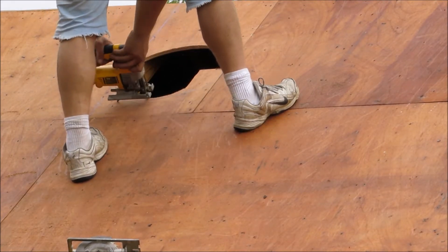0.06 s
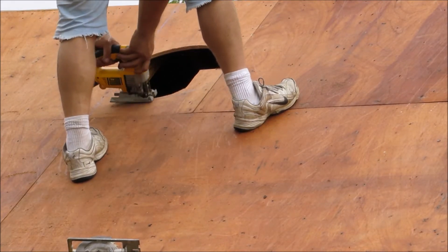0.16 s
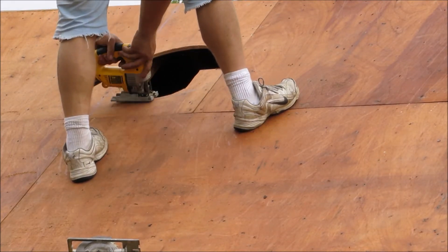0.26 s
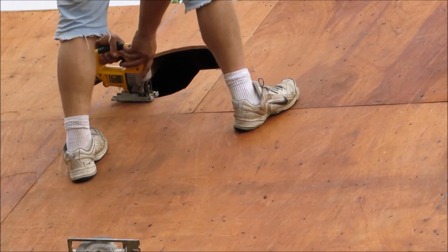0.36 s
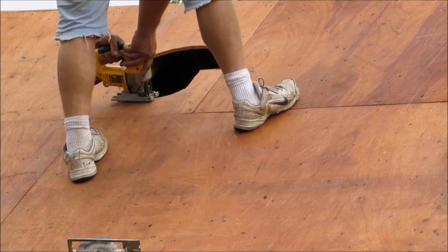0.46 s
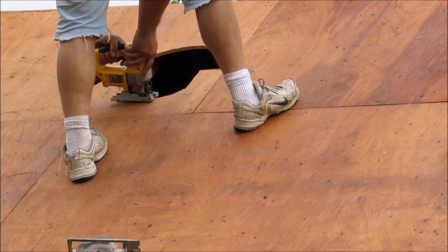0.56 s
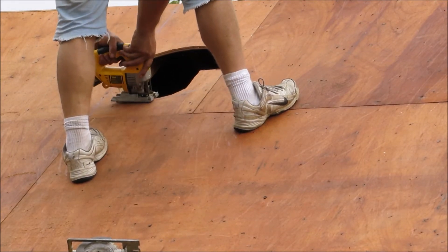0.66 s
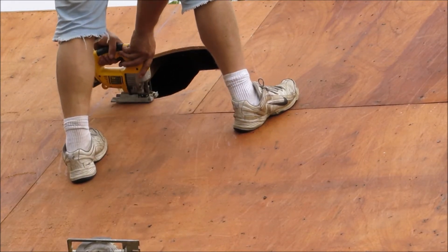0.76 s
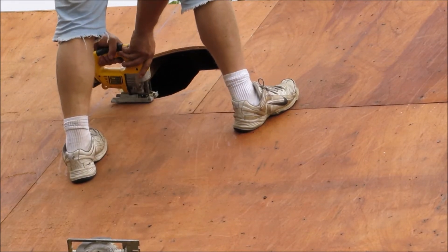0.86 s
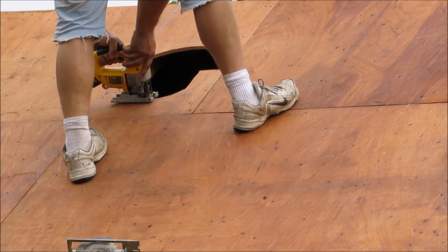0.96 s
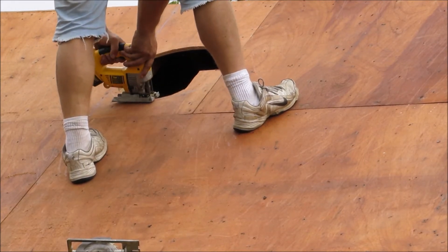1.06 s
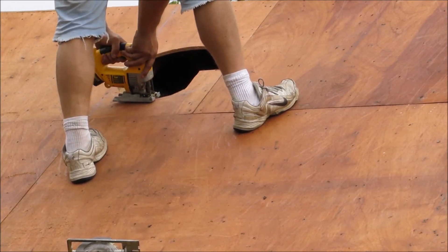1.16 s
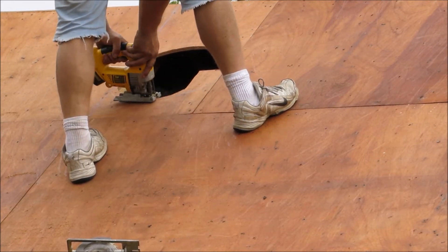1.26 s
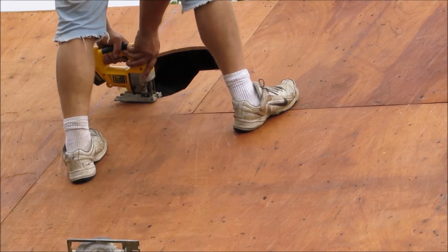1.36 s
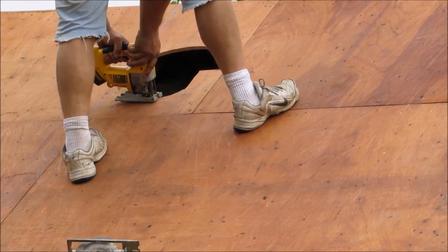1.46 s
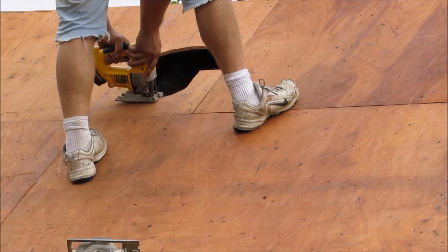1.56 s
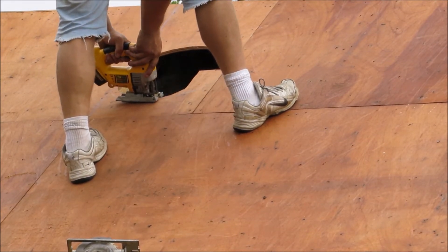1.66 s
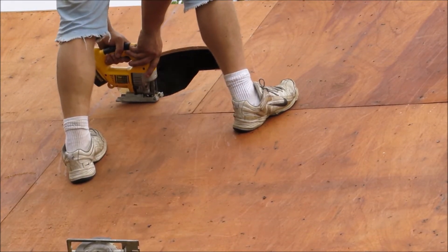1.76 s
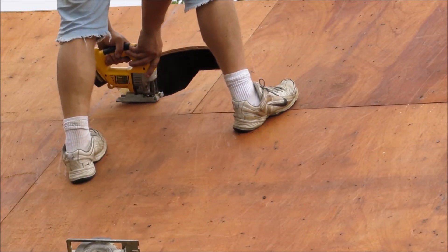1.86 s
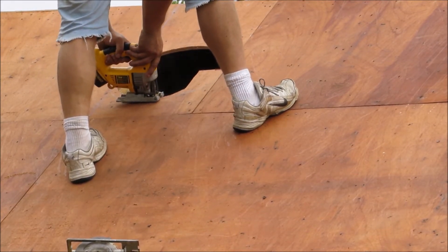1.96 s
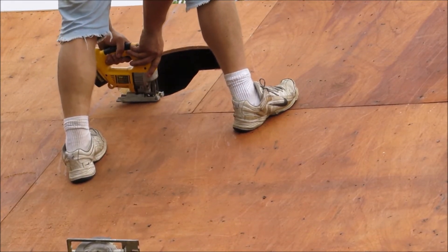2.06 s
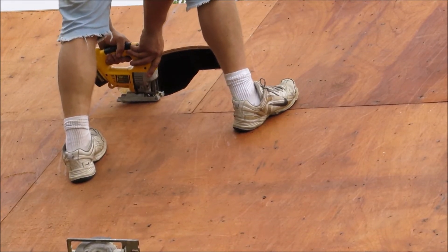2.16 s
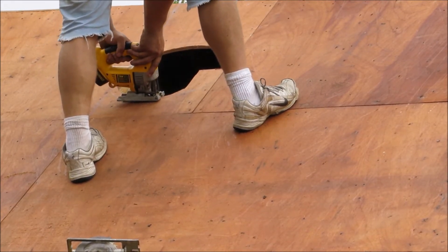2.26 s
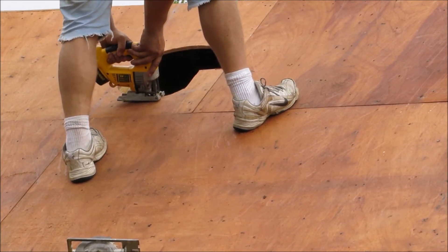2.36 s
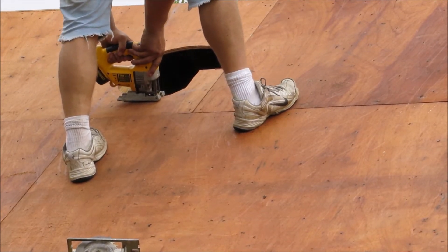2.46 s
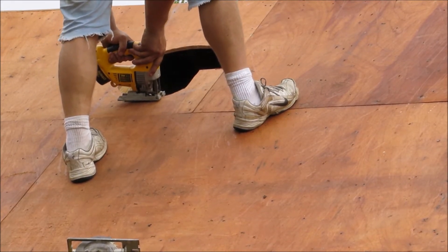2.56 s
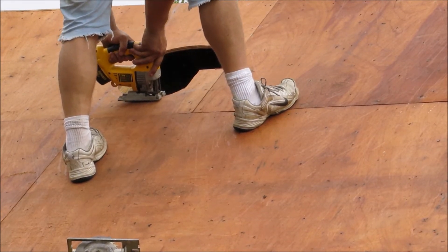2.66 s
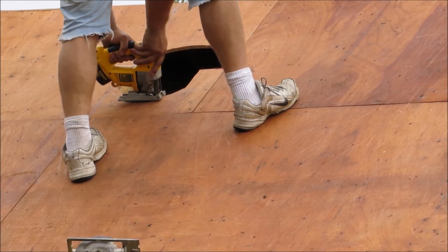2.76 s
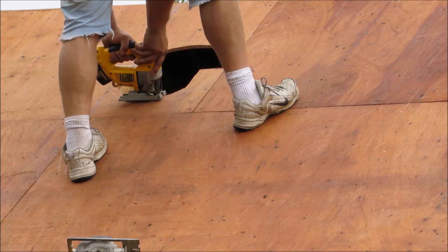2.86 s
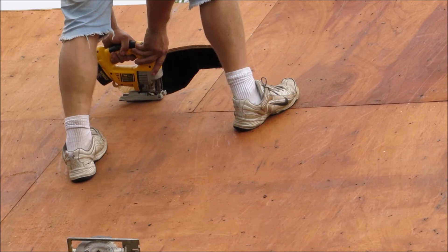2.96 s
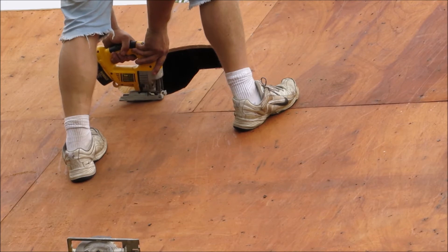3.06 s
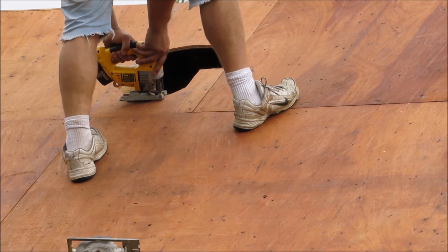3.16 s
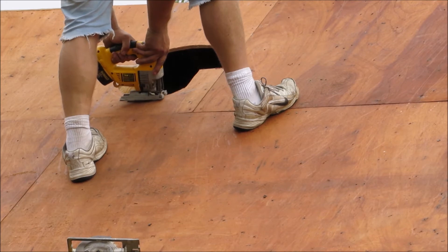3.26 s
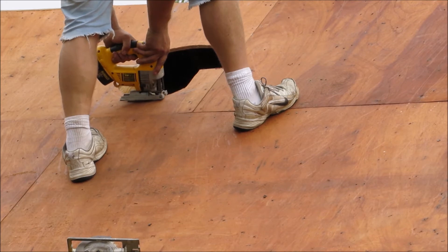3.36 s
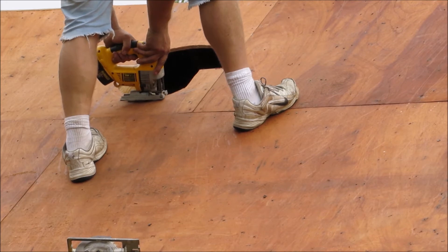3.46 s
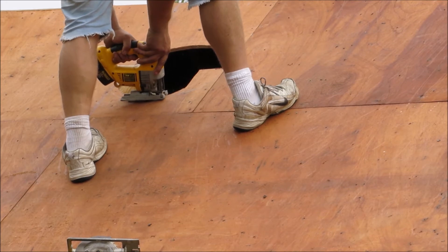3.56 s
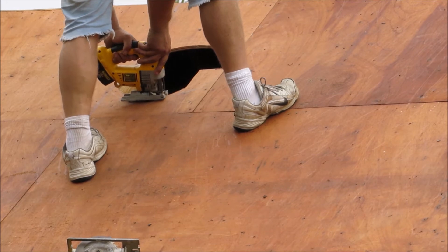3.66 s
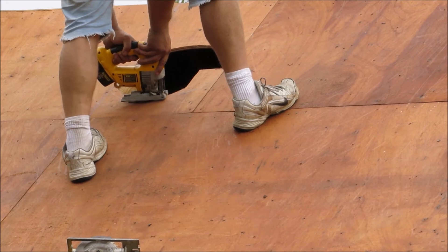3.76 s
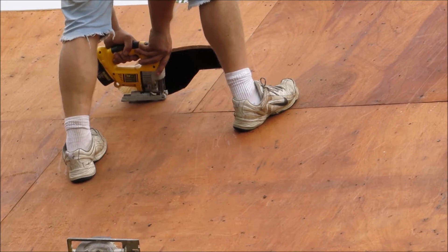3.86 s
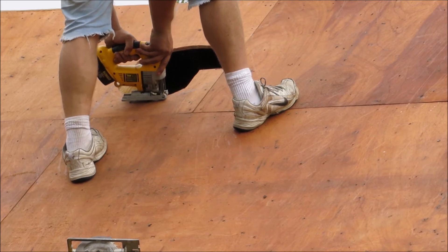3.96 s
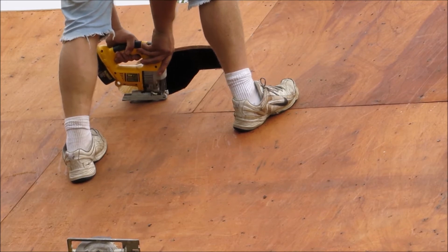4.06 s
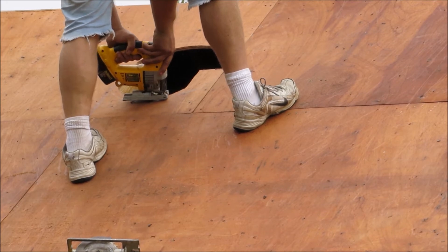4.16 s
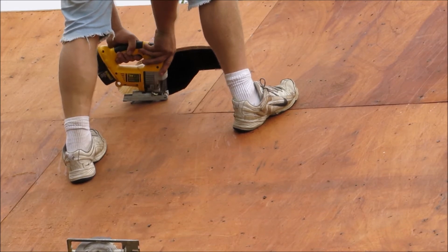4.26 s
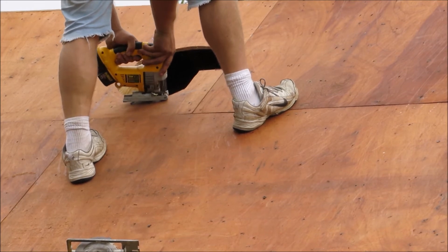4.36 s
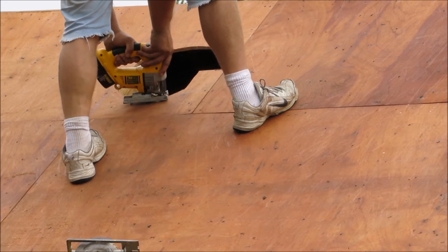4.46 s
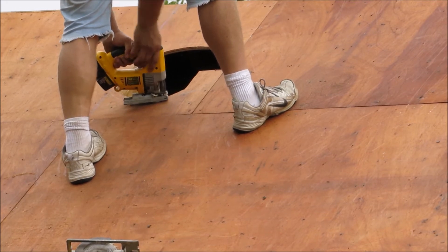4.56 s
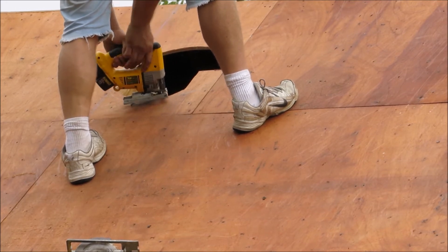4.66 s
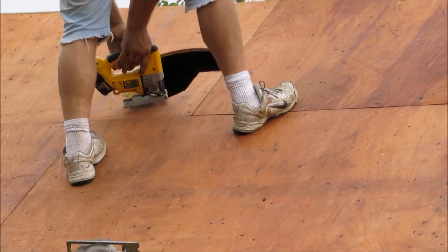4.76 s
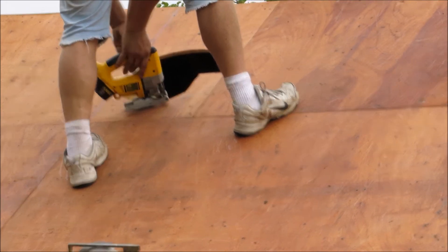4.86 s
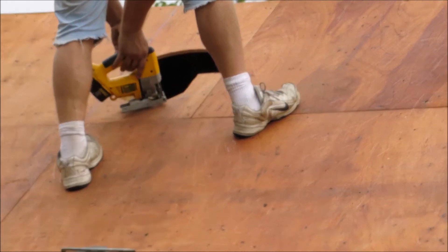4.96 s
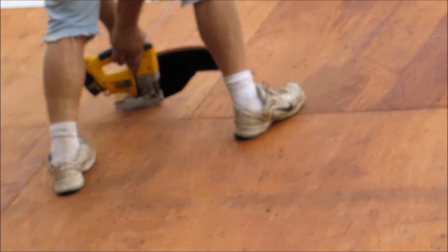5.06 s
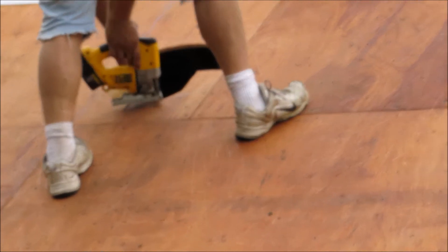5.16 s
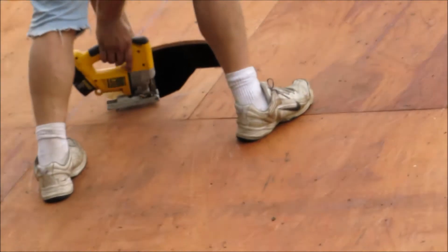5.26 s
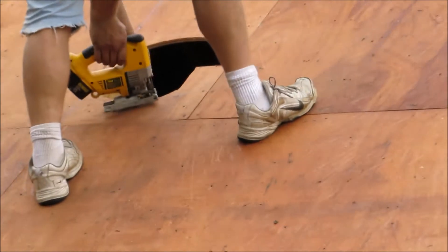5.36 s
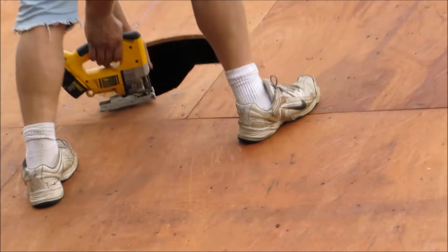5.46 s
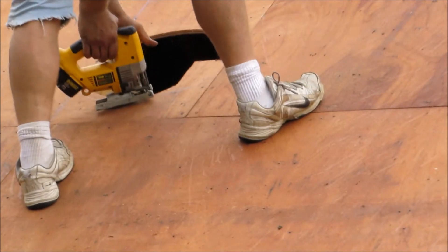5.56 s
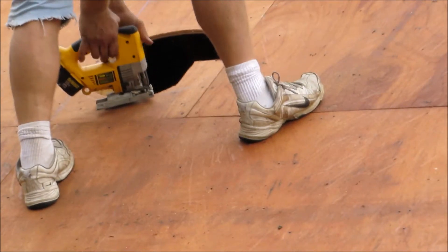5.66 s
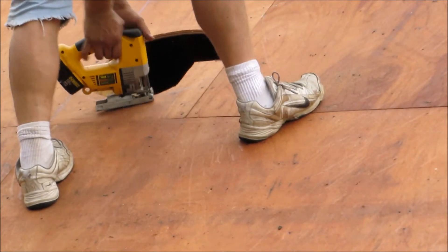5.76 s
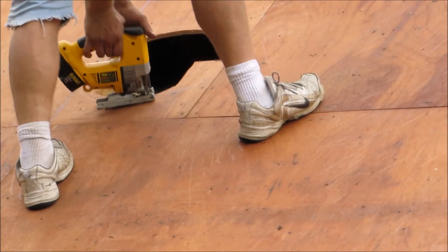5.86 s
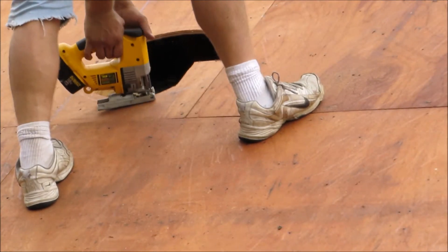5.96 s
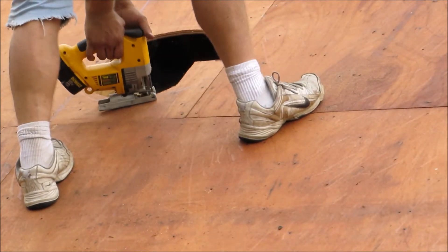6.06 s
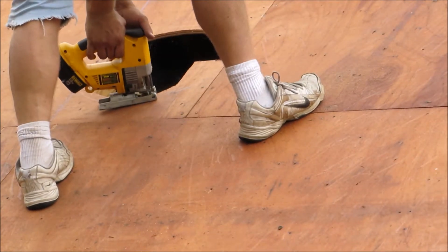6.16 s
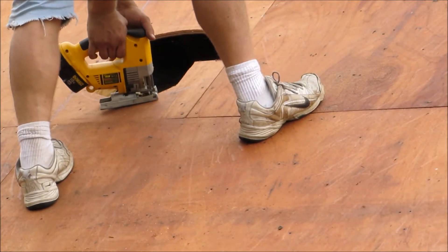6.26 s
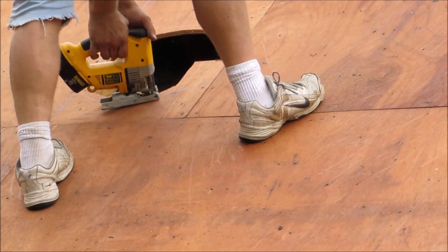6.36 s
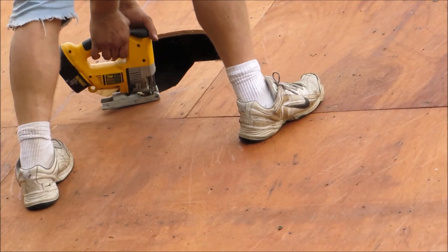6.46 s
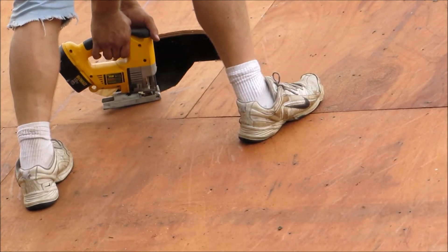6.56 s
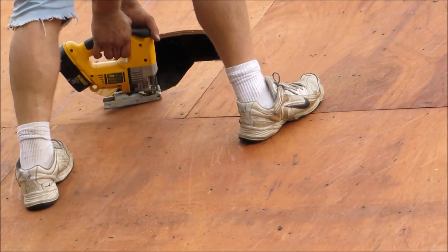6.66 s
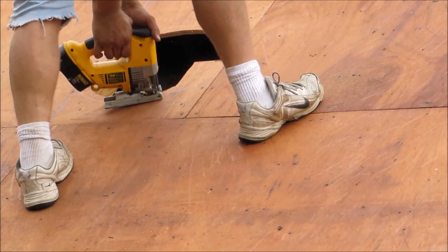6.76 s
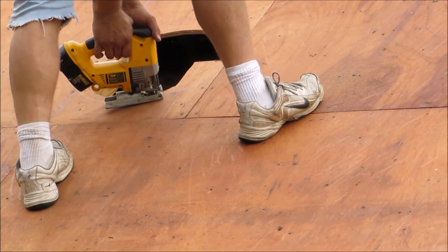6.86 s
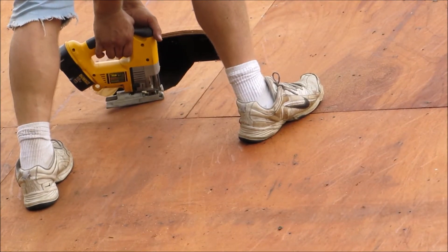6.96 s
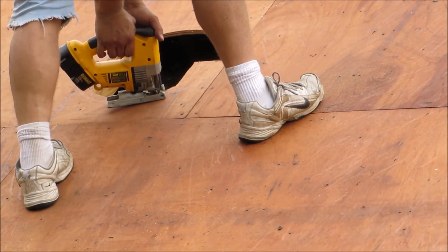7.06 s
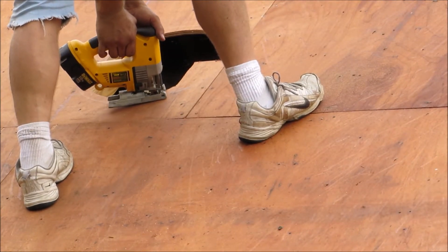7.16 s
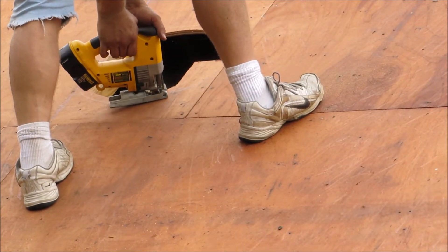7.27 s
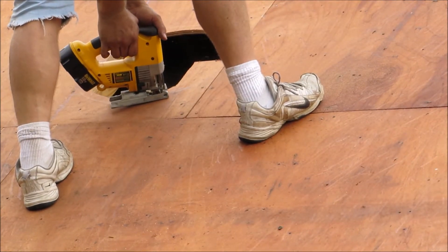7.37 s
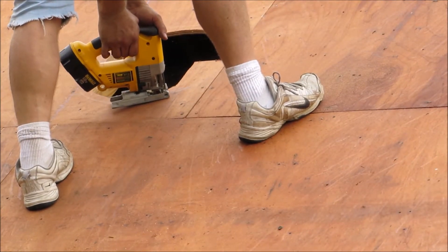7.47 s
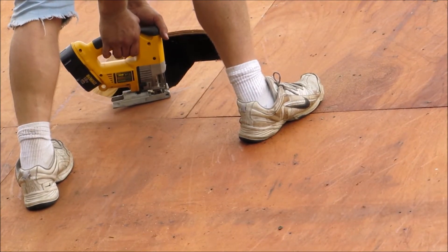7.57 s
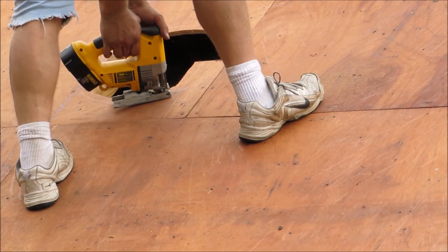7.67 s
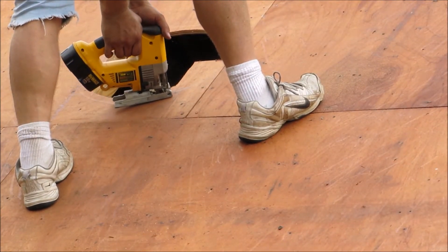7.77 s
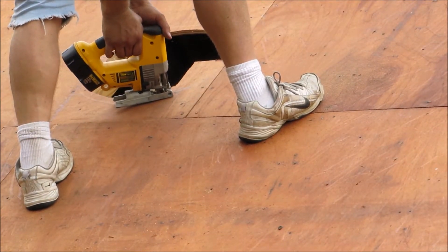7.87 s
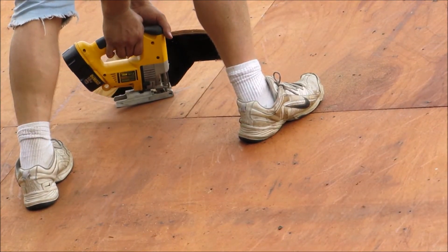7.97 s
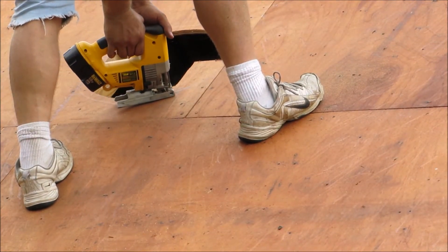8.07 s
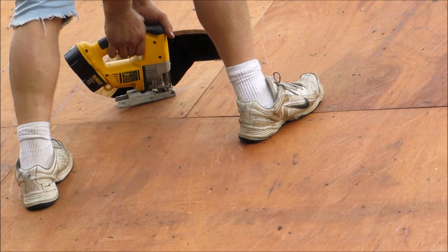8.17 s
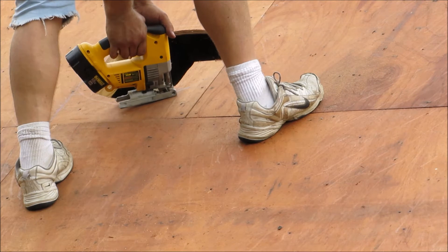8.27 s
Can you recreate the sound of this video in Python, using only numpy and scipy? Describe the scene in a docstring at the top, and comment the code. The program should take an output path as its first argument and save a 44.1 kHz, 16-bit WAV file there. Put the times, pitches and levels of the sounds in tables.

```python
"""Outdoors on a plywood deck, a cordless jigsaw is set down, cuts, shifts with small clicks, cuts again.
A distant machine hums over the quiet air. The saw's shoe knocks on the sheet and rings its modes.
Each upstroke tears the wood, ringing and shaking the sheet; the tone changes as the saw moves along
its curve. Over the tearing the teeth rasp, the blade hisses and briefly squeals, and the gears whine."""
import sys
import numpy as np
from scipy import signal
from scipy.fft import rfft, irfft, next_fast_len
from scipy.io import wavfile
from scipy.ndimage import uniform_filter1d

SR = 44100
rng = np.random.default_rng(int(sys.argv[2]) if len(sys.argv) > 2 else 0)


def waveform_to_disk(signal):
    """Save audio, clipped to [-1, 1], as 16-bit WAV at the path in sys.argv[1]."""
    frames = np.transpose(np.atleast_2d(signal))
    scaled = np.clip(frames, -1, 1) * 32767
    samples = np.round(scaled).astype(np.int16)
    wavfile.write(sys.argv[1], SR, samples)


N = 367353
TIME = np.arange(N) / SR


def amp(db):
    return 10 ** (np.asarray(db) / 20)

def unit_rms(x):
    return x / np.sqrt(np.mean(x ** 2) + 1e-20)

def phase(hz):
    return 2 * np.pi * np.cumsum(hz) / SR

def curves(rows, t):
    """Every column of a table, read at the times t."""
    times, *columns = np.transpose(rows)
    return [np.interp(t, times, column) for column in columns]

def along(spot, values):
    """Values at evenly spaced spots on the saw's path, read at one spot (0-1)."""
    return np.interp(spot, np.linspace(0, 1, len(values)), values)

def eq(x, points):
    """Filters by a curve of (f/Hz, gain/dB) points."""
    size = next_fast_len(x.shape[-1] + SR // 20)
    bins = np.fft.rfftfreq(size, 1 / SR)
    hz, db = np.transpose(points)
    gain = amp(np.interp(np.log(bins + 1), np.log(hz + 1), db))
    return irfft(rfft(x, size) * gain, size)[..., :x.shape[-1]]

def ring(x, hz, width):
    """One resonance of peak gain 1."""
    return signal.lfilter(*signal.iirpeak(hz, hz / width, SR), x)

def drift(shape, seconds):
    """Smooth random modulation of rms 1."""
    span = round(seconds * SR)
    return unit_rms(uniform_filter1d(uniform_filter1d(rng.standard_normal(shape), span), span))

def add(mix, s, sound):
    part = mix[:, round(s * SR):][:, :sound.shape[-1]]
    part += sound[..., :part.shape[-1]]

# Stereo width: f/Hz, side gain/dB
WIDTH = [(60, -23), (150, -8.5), (380, -12.5), (950, -16.5), (2380, -13), (5980, -10.5), (15000, -8)]
def stereo(pair):
    """Mid and side become left and right."""
    side = eq(pair[1], WIDTH)
    return np.array([pair[0] + side, pair[0] - side])

# Tone of the outdoor wash: f/Hz, level/dB
AIR_EQ = [(200, -13), (300, -5.5), (500, -4.5), (1000, -3), (3000, -12), (4000, -12.5), (7000, -12),
          (10000, -14.5), (13000, -21.5), (15000, -32)]
# Tone of the far rumble: f/Hz, level/dB
RUMBLE_EQ = [(15, -16), (30, -7), (60, 2), (150, -2.5), (300, -1.5), (450, -63)]
# Steady resonances in the wash: f/Hz, width/Hz, gain/dB
AIR_BANDS = [(372, 39, 4), (1470, 110, 1), (2340, 210, 1), (6540, 55, 8.5)]
# Fader ride of the wash: t/s, level/dB, treble/dB
AIR_RIDE = [(0, -53.5, -12), (.15, -56.5, -7.5), (.9, -57.5, -6), (4.7, -54, -6), (5, -56.5, -3.5),
            (8.33, -55, -13)]
def air():
    """The outdoor bed: distant wash and rumble, only partly alike left and right."""
    db, treble_db = curves(AIR_RIDE, TIME)
    noise = rng.standard_normal((3, N))
    wash = eq(0.45 * noise[0] + noise[1:], AIR_EQ)
    wash = unit_rms(wash + sum(amp(gain) * ring(wash, hz, width) for hz, width, gain in AIR_BANDS))
    wash *= amp(db + 0.16 * drift(N, 0.02))
    low = eq(wash, [(4000, 6.5), (9000, -24)])
    far = rng.standard_normal((3, N))
    rumble = amp([[-65], [-63]]) * unit_rms(eq(far[0] + .5 * far[1:], RUMBLE_EQ))
    return low + amp(treble_db) * (wash - low) + rumble

# The hum swells and fades, then holds: t/s, level/dB
HUM_RIDE = [(0.0, -40.5), (0.16, -61), (0.25, -48), (0.51, -44), (0.69, -47.5), (0.76, -57.5),
            (0.95, -43.5), (1.28, -42), (1.39, -52.5), (1.74, -45), (1.92, -47), (2.04, -72), (2.13, -49.5),
            (2.37, -43), (2.83, -43), (2.99, -60.5), (3.6, -60.5), (4.04, -46), (4.5, -44.5), (8.33, -43.5)]
# Its wavering overtone: harmonic number, width/Hz, level/dB
HUM_OVERTONES = [(2, 6.1, -64)]
def distant_machine(hum_hz=87.94, rise_hz_per_db=0.17):
    """A low hum, right of centre, that goes a little sharp as it fades."""
    db, = curves(HUM_RIDE, TIME)
    angle = phase(hum_hz + rise_hz_per_db * (-44 - db))
    tone = np.sqrt(2) * amp(db) * np.sin(angle)
    for k, width, overtone_db in HUM_OVERTONES:
        a, b = drift((2, N), 0.55 / width)
        tone += amp(overtone_db) * ((a + 1.73) * np.sin(k * angle) + b * np.cos(k * angle))
    return tone * amp([[-2.5], [2]])

# Modes of the saw's housing: f/Hz, width/Hz, level/dB
HOUSING_MODES = [(904, 100, 22), (1360, 270, 20), (1810, 97, 18)]
# Handling clicks: t/s, peak of the ring/dB, treble over the ring/dB
CLICKS = [(4.782, -28, -23), (4.801, -48, 10), (4.864, -43.5, 4), (5.454, -45, -20), (5.544, -28.5, -21),
          (5.918, -32, -1)]
def click(db, treble_db, ring_t60=0.031, spray_t60=0.014):
    """Metal parts tick: a brief ring of the housing and a spray of treble."""
    t = np.arange(round(.1 * SR)) / SR
    tick = rng.standard_normal((2, len(t))) * np.minimum(t / 0.00047, 1)
    strike = tick * amp(-60 * t / ring_t60)
    housing = sum(amp(gain) * ring(strike, hz, width) for hz, width, gain in HOUSING_MODES)
    spray = eq(tick, [(2500, -37), (4900, 10), (6500, -3), (10000, 1), (16000, -1)])
    spray *= amp(-60 * t / spray_t60)
    spray *= amp(treble_db) / abs(spray[0]).max()
    return amp(db) * stereo(housing / abs(housing[0]).max() + spray)

def resonate(drive, modes, spot, compression=0):
    """Rings a mode bank balanced for the saw's spot; compression holds down each mode's slow swells."""
    gains = [amp(along(spot, db)) for _, _, *db in modes]
    rung = power = 0
    for k, (gain, (hz, width, *_)) in enumerate(zip(gains, modes)):
        mode = ring(drive, hz, width)
        swell = abs(uniform_filter1d(mode[0] ** 2, 5400)) / np.mean(mode[0] ** 2) + 1e-6
        rung += (-1) ** k * gain * mode / swell ** (compression / 2)
        power += gain ** 2 * width
    return rung / np.sqrt(power * np.pi / SR)

# Modes of the plywood sheet: f/Hz, width/Hz, level/dB at each of four spots along the path
DECK_MODES = [(475.3, 46, -2, -4, -8.5, -6.5), (608, 50.4, 1.5, 0.5, -2, 0), (655.6, 39.6, -4, -3, 5, 1.5),
              (702.3, 57, -7.5, -2.5, 1.5, 1), (949, 75, -9, -4.5, -1, -7.5),
              (1080, 64, -3, -1.5, -2.5, -6), (1435, 172, -5, -7, -1.5, -7), (1536.4, 61.4, 5, -0.5, 5, -1),
              (2005, 280, -10.5, -7, -2.5, -7), (2107, 62, 5.5, -0.5, 0, -9),
              (2359, 180, -1, -2.5, -1.5, -11.5), (2448, 193, -3, -3, -2, -1),
              (2640, 94, -4.5, -4, -9.5, -7), (2960, 172, -4.5, -8, -6, -9.5),
              (3490, 560, -11.5, -8.5, -10, -16.5)]
def deck(drive, spot, compression=0):
    """The sheet rings, its modes driven unevenly from spot to spot."""
    return resonate(drive, DECK_MODES, spot, compression)

# The shoe meets the deck: t/s, peak of the wood/dB, contact/s
KNOCKS = [(0.2, -33, 0.0045), (0.268, -44.5, 0.0053), (0.355, -20, 0.0095), (0.383, -31.5, 0.026),
          (0.428, -30, 0.0059), (0.449, -36.5, 0.011), (0.489, -39, 0.0051), (0.567, -42, 0.0052),
          (0.917, -40.5, 0.0074), (2.735, -26, 0.0041), (4.079, -34, 0.0061), (4.17, -30.5, 0.006),
          (4.642, -33.5, 0.0054), (4.897, -30.5, 0.00073), (5.822, -29.5, 0.0045), (5.86, -29, 0.006),
          (5.919, -29, 0.0056), (5.981, -27, 0.012), (6.028, -30, 0.0065), (6.086, -28.5, 0.008)]
def knock(db, contact, pressed):
    """A soft, rattling blow rings the sheet; its low thump is weaker once the saw presses down."""
    t = np.arange(round(.3 * SR)) / SR
    envelope = np.minimum(t / 0.0019, 1) * (np.exp(-t / contact) + 0.67 * amp(-60 * t / 0.47))
    blow = eq(rng.standard_normal((2, len(t))) * envelope,
              [(40, 6), (100, 22.5), (250, 11), (500, 3), (1000, 0), (3000, -12.5), (8000, -27)])
    wood = deck(blow, spot=0.15) + 0.21 * blow
    wood *= amp(-60 * t / (42 * contact))  # a brief tap is damped soon
    thump_db = (-24 if pressed else -11) - 60 * t / min(0.058, 20 * contact)
    thump = amp(thump_db) * (np.sin(2 * np.pi * 60 * t) + np.sin(2 * np.pi * 290 * t))
    return amp(db) * stereo(wood / abs(wood[0]).max() + thump)

# Fader rides of the motor tones: t/s, gear whine/dB, whistle before its trim/dB
WHINE_RIDE = [(1.02, -74, -74), (1.055, -53, -72), (1.125, -56, -72), (1.3, -56, -72), (1.42, -57, -71),
              (1.5, -65, -71), (1.8, -62, -68), (2.3, -56, -62), (2.9, -60, -66), (3.3, -59, -66),
              (4.0, -55, -64), (4.1, -62, -64), (4.6, -60, -68), (6.0, -68, -78), (6.2, -52, -77),
              (6.4, -60, -76), (7.2, -61, -72), (7.6, -62, -62), (8.3, -62, -61)]
def gear_whine(t, rate, angle, mesh_per_stroke=194, whistle_trim_db=-2.5):
    """The gears mesh in a jittery whine, with the motor's thin whistle an octave up."""
    whine_db, whistle_db = curves(WHINE_RIDE, t)
    jitter = .002 * drift(len(t), .004) + .001 * drift(len(t), .05)
    mesh = mesh_per_stroke * (angle + phase(rate * jitter))
    whine = amp(whine_db + 2.9 * drift(len(t), 0.028)) * np.sin(mesh)
    whistle = amp(whistle_db + whistle_trim_db + 3.5 * drift(len(t), .04)) * np.sin(2 * mesh)
    return whine + whistle

def throb(x, cycle, depth_db, force_db, grab=0.07, hold=0.33, release=0.66):
    """Teeth grab fast and let go slowly (in turns after contact); the average level stays even."""
    grip = np.interp(cycle % 1, [0, grab, hold, release, 1], [0, 1, 1, 0, 0])
    pulsed = x * amp(depth_db * grip + force_db)
    return np.std(x) * pulsed / np.sqrt(uniform_filter1d(pulsed[0] ** 2, 6000))

# Modes of blade, shoe and housing: f/Hz, width/Hz, level/dB at start, middle and end of the path
BLADE_MODES = [(4130, 280, 3.5, -3, 5), (4740, 166, 4, 3.5, 8), (5170, 490, -1.5, -2, 2.5),
               (6200, 450, -4, -1.5, 2.5), (6920, 230, -5.5, -5, 3), (7640, 440, -3, 1, 7),
               (7960, 1900, -8, -5, 0.5), (10150, 1700, -9, -2.5, 0.5), (10820, 740, -3.5, -2, 2.5),
               (11610, 430, 0, 2, -2), (12530, 2140, -14.5, -3.5, -2), (13210, 1300, -12, -5, 0.5)]
def blade_hiss(t, angle, cycle, spot, depth_db, force_db):
    """Friction: the lower band follows the teeth, the top rubs going up and coming down."""
    friction = rng.standard_normal((2, len(t))) * amp(1.4 * drift(len(t), 0.0024))
    lower = eq(friction, [(6000, 0), (8000, -30)])
    rub_db = 1.24 * np.cos(angle - .6) + 1.3 * np.cos(2 * angle - 3.7)
    scrape = throb(lower, cycle, 0.85 * depth_db, force_db) + (friction - lower) * amp(rub_db)
    return unit_rms(resonate(unit_rms(scrape), BLADE_MODES, spot))

# A squeal late in the first cut: t/s, level/dB, f/Hz
SQUEAL = [(3.82, -63, 2420), (3.9, -47, 2420), (3.98, -60, 2400), (4.03, -45, 2370), (4.09, -40.5, 2390),
          (4.12, -48, 2250), (4.15, -43, 2050), (4.21, -70, 2000)]
def blade_squeal(t, angle):
    """The blade squeals in one wavering pulse a stroke."""
    db, hz = curves(SQUEAL, t)
    pulse = amp(db + 3.8 * drift(len(t), 0.0069)) * (1 + np.cos(angle)) ** 2 / 2
    return pulse * np.sin(phase(hz + 50 * drift(len(t), .004)))

# Harmonics of the stroke: harmonic number, level/dB at start, middle and end of the path
CRANK_HARMONICS = [(3, -67, -65, -64), (4, -69, -70, -63), (5, -63, -63, -67), (7, -68, -67, -63),
                   (9, -61, -70, -66), ]
def crank_beat(angle, spot, bite_db):
    """The sheet carries the crank's beat as a low buzz that drops away when the bite is light."""
    duck_db = np.clip(bite_db + 46, -40, 0)
    buzz = 0
    for k, *db in CRANK_HARMONICS:
        level = amp(along(spot, db) + duck_db + 1.8 * drift(len(angle), 0.11))
        buzz += level * np.sqrt(2) * np.sin(k * angle + k * k)
    return buzz

# Singing notes in the second cut: harmonic number, centre t/s, half-length/s, level/dB
SINGING = [(22, 6.27, .1, -49), (20, 6.62, .15, -47), (20, 6.92, .15, -42), (21, 7.18, .2, -41),
           (20, 7.27, .13, -42), (23, 7.9, .25, -50), (20, 8.05, .38, -43)]
def sheet_singing(t, angle, cycle):
    """Single stroke harmonics swell and sing near the sheet's modes, pulsing with the blade."""
    pulse_db = 4 * np.cos(2 * np.pi * (cycle - 0.39))
    notes = 0
    for k, s, half, db in SINGING:
        level = amp(db + 0.44 * drift(len(t), 0.025) + pulse_db) * np.exp(-((t - s) / half) ** 2)
        notes += level * np.sqrt(2) * np.sin(k * angle + s)
    return notes

# Tone of the shaking sheet: f/Hz, gain/dB
SHAKE_EQ = [(62, -30), (105, -5), (119, -16.5), (172, 2.5), (199, -8.5), (221, -8.5), (450, -12.5),
            (580, -9.5), (990, -120)]
# The saw bucks: t/s, level/dB, decay/s
BUCKS = [(2.62, -43, 0.11), (2.96, -45, 0.066), (3.55, -51, 0.11), (5.82, -48.5, 0.48)]
def sheet_shake(t, tear):
    """The tearing shakes the whole sheet: a low rumble that surges when the saw bucks."""
    bucking = sum(amp(db) * np.clip((t - s) / 0.037, 0, 1) * np.exp(-abs(t - s) / decay)
                  for s, db, decay in BUCKS)
    return (amp(-60.5 + 2 * drift(len(t), 0.13)) + bucking) * unit_rms(eq(tear, SHAKE_EQ))

# The rasping note: t/s, starting f/Hz, level over the bite/dB
RASP = [(1, 3200, -9), (2.1, 3000, -9), (2.3, 3200, -11), (3.1, 3600, -11), (4.7, 3000, -17),
        (6.2, 3650, -12), (6.85, 3550, -11), (7.05, 2900, -10), (7.5, 2650, -11), (8.3, 2600, -16)]
def tooth_rasp(t, cycle, spot, force_db, sag_hz=(1700, 1300, 750)):
    """Teeth passing the sheet's face sing a rough note that sinks as the blade slows in each upstroke."""
    top_hz, db = curves(RASP, t)
    upstroke = np.minimum((cycle + .05) % 1 / 0.5, 1)
    hz = top_hz - along(spot, sag_hz) * upstroke + 650 * drift(len(t), .0007) + 80 * drift(len(t), .1)
    note = np.sin(phase(hz) + np.array([[0], [1]]))
    note *= np.sin(np.pi * upstroke ** 0.78) * amp(2 * drift(len(t), 0.0042))
    return amp(db + force_db) * unit_rms(sum(ring(note, *mode[:2]) for mode in DECK_MODES))

def tearing(turns, cycle, depth_db, low_depth_db, force_db, steps=1300):
    """Wood tears: random chips, plus patterns that repeat as the same teeth meet the same kerf."""
    n = len(turns)
    chips = rng.standard_normal((2, n)) * amp(1.6 * drift(n, 0.0014))
    patterns = rng.standard_normal((4, 2, steps))[:, :, (turns % 1 * steps).astype(int)]
    crossfade = 0.53 + drift((4, 1, n), 0.12)
    teeth = unit_rms((patterns * crossfade).sum(0))
    grain = 0.98 * unit_rms(chips) + eq(teeth, [(20, -10.5), (700, 4.5), (1500, -1), (4000, -3.5)])
    lows = eq(grain, [(850, 0), (1250, -30)])
    late_lows = throb(lows, cycle - 0.14, low_depth_db, force_db)  # the low modes answer later
    return throb(grain - lows, cycle, depth_db, force_db) + late_lows

# Blade speed, a table a cut; it spins up, then sags and recovers with the load: t/s, stroke rate/Hz
STROKE_RATES = [
    [(0.92, 22.0), (1.06, 30.7), (1.14, 32.74), (1.35, 33.44), (1.58, 32.6), (2.2, 33.63), (2.5, 33.7),
     (2.7, 32.5), (2.9, 32.62), (3.02, 32.15), (3.24, 33.75), (3.7, 33.78), (3.95, 34.12), (4.2, 33.35),
     (4.45, 34.05), (4.7, 33.8)],
    [(5.82, 22.0), (5.89, 29.0), (6.06, 30.1), (6.18, 32.0), (6.87, 32.47), (7.29, 32.3), (7.71, 33.02),
     (8.33, 32.76)],
]
# How hard the teeth bite, a table a cut: t/s, level/dB
BITES = [
    [(0.9, -55), (0.94, -46), (1.16, -37.5), (1.52, -34.5), (2.35, -39.5), (2.75, -36.5), (3.26, -41.5),
     (3.64, -40), (4.01, -43), (4.1, -40.5), (4.63, -43), (4.71, -49.5), (4.78, -68)],
    [(5.79, -57), (5.82, -52.5), (5.9, -40), (6.28, -37.5), (6.95, -37.5), (7.28, -37.5), (7.4, -38.5),
     (8.33, -37.5)],
]
# The saw's path along its curve: t/s, spot/0-1
PATH = [(1, 0.1), (2.1, 0.03), (2.2, 0.25), (3.1, 0.3), (3.3, 0.45), (4.7, 0.54), (5.8, 0.48), (6.4, 0.99),
        (7.25, 0.91), (7.5, 0.88), (7.8, 0.86), (8.3, 0.88)]
# Feel of the stroke: t/s, tearing throb/dB, low throb/dB, low shelf/dB, first contact/turns
STROKE_SHAPE = [(1, 3.5, 8, 1.5, 0.87), (1.3, 10, 8, -1, 0.8), (2.1, 7.5, 2, 0.5, 0.78),
                (2.2, 5, 2, -3.5, 0.85), (2.8, 7, 3.5, -0.5, 0.7), (3.05, 4.5, 9, 0.5, 0.81),
                (3.3, 3, 3, -2.5, 0.87), (4.7, 3.5, 1, 0, 0.737), (5.8, 4, 1.5, 0.5, 0.78),
                (7.1, 5, 10.5, 0, 0.84), (8.3, 4, 11, -1.5, 0.69)]
def jigsaw_cut(rates, bites, first_turn, off_s, rise_s=0.022, brake_db_per_s=182):
    """One cut, a stroke per crank turn; hiss and whine die fast once the trigger is let go."""
    t = np.arange(bites[0][0], bites[-1][0], 1 / SR)
    rate, = curves(rates, t)
    bite_db, = curves(bites, t)
    spot, = curves(PATH, t)
    depth_db, low_depth_db, shelf_db, contact = curves(STROKE_SHAPE, t)
    turns = np.cumsum(rate) / SR
    turns += first_turn - np.interp(rates[0][0], t, turns)
    angle = 2 * np.pi * turns
    cycle = turns - contact  # a whole number each time the teeth meet the wood
    stroke = np.round(turns).astype(int) + 2
    force_db = 0.32 * uniform_filter1d(rng.standard_normal(300)[stroke], 200)  # no two bite alike

    tear = tearing(turns, cycle, depth_db, low_depth_db, force_db)
    wood = unit_rms(deck(tear, spot, compression=0.5))  # each mode's slow swells are held down
    wood += tooth_rasp(t, cycle, spot, force_db)
    wood += (amp(shelf_db) - 1) * eq(wood, [(800, 0), (900, -30)])
    sound = amp(bite_db) * wood + sheet_shake(t, tear)
    sound += blade_squeal(t, angle) + crank_beat(angle, spot, bite_db) + sheet_singing(t, angle, cycle)

    hiss_db = -49.5 + 0.27 * (bite_db + 39) + 1.4 * 20 * np.log10(rate / 33)  # grows with bite and speed
    hiss = amp(hiss_db) * blade_hiss(t, angle, cycle, spot, depth_db, force_db)
    motor = np.minimum((t - t[0]) / rise_s, 1) ** 2 * amp(-brake_db_per_s * np.maximum(t - off_s, 0))
    sound += motor * (hiss + gear_whine(t, rate, angle))
    return stereo(sound * signal.windows.tukey(len(t), .006))

def scene():
    """Hum and air under the knocks, clicks and two cuts."""
    mix = distant_machine() + air()
    first_cut_s = STROKE_RATES[0][0][0]
    for s, db, contact in KNOCKS:
        add(mix, s - .002, knock(db, contact, pressed=s > first_cut_s))
    for s, db, treble_db in CLICKS:
        add(mix, s - .001, click(db, treble_db))
    first_turns, trigger_off_s = (.64, .21), (4.63, 8.33)
    for rates, bites, first_turn, off_s in zip(STROKE_RATES, BITES, first_turns, trigger_off_s):
        add(mix, bites[0][0], jigsaw_cut(rates, bites, first_turn, off_s))
    return mix

# Narrow dips in the treble: f/Hz, width/Hz, share removed/0-1
NOTCHES = [(3894, 560, 0.69), (7820, 320, 1)]
def record(dry, cutoff_hz=14550):
    """Master EQ: two notches, then a steep low-pass."""
    for hz, width, share in NOTCHES:
        dry = dry - share * ring(dry, hz, width)
    low_pass = signal.firwin(511, cutoff_hz, window=("kaiser", 9), fs=SR)
    return signal.oaconvolve(dry, low_pass[None], "same")


dry = scene()
out = record(dry)
waveform_to_disk(out)
```